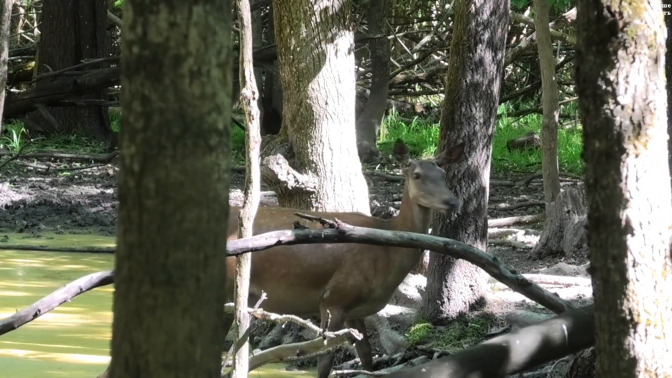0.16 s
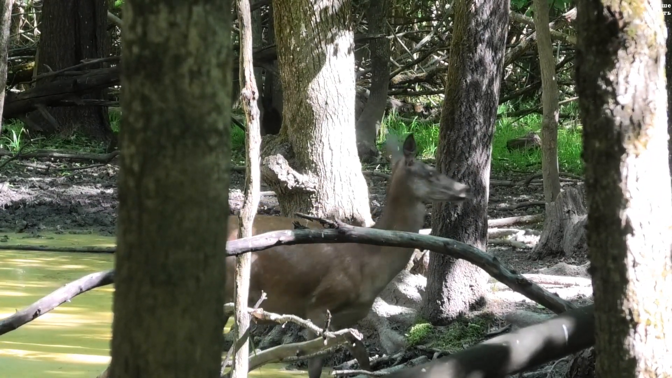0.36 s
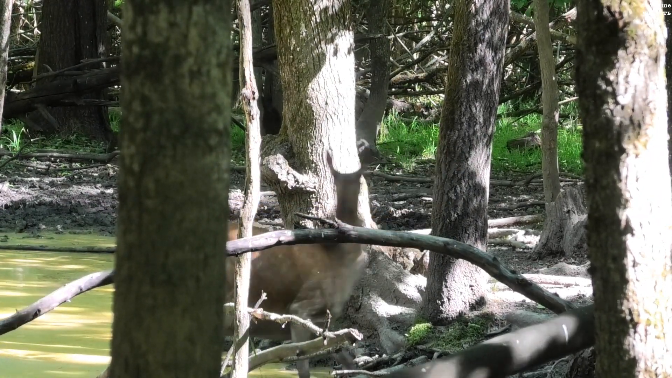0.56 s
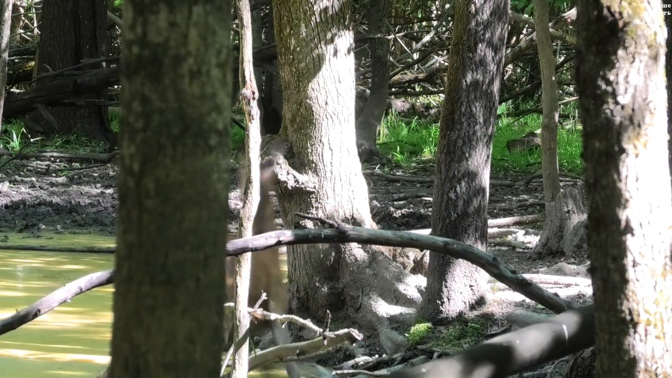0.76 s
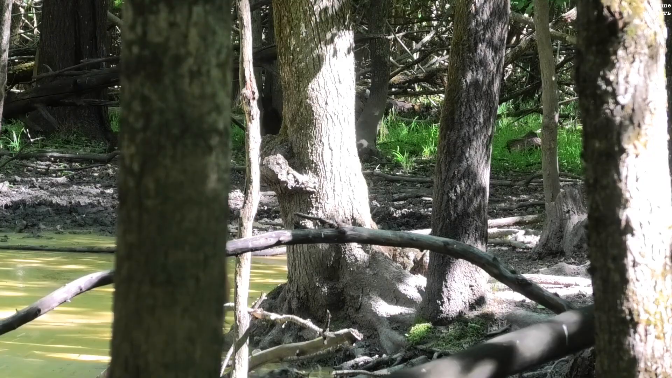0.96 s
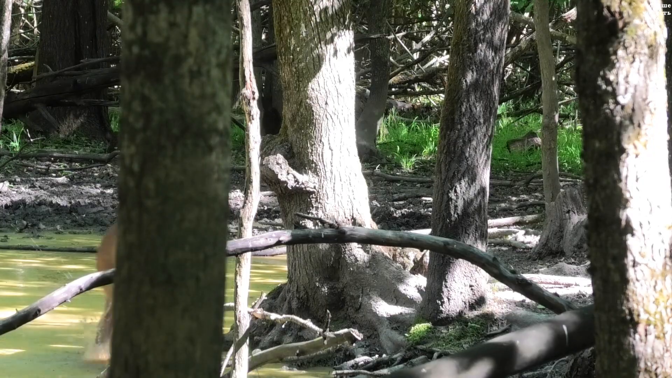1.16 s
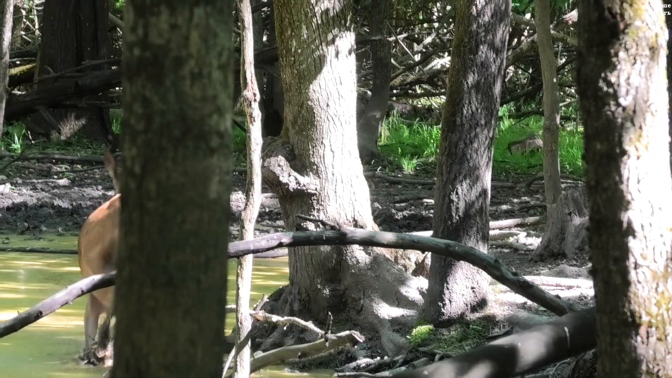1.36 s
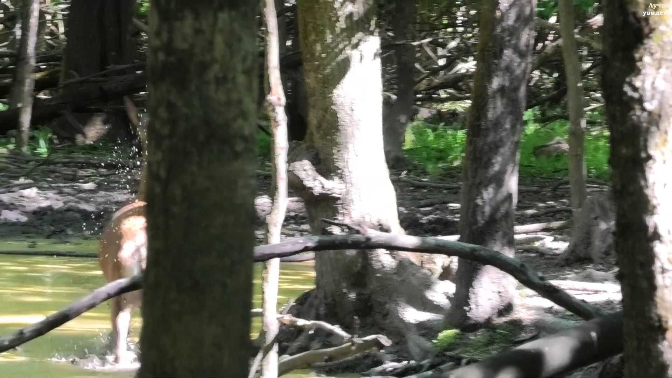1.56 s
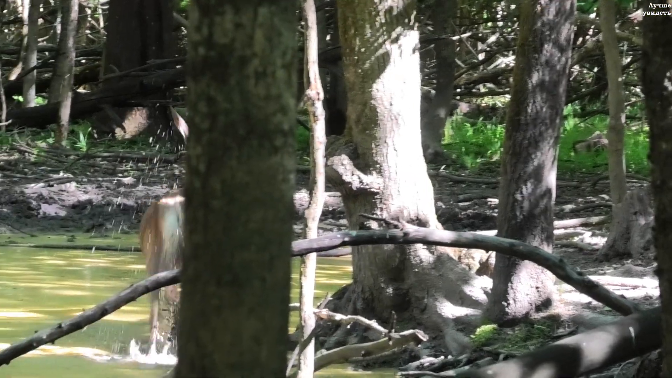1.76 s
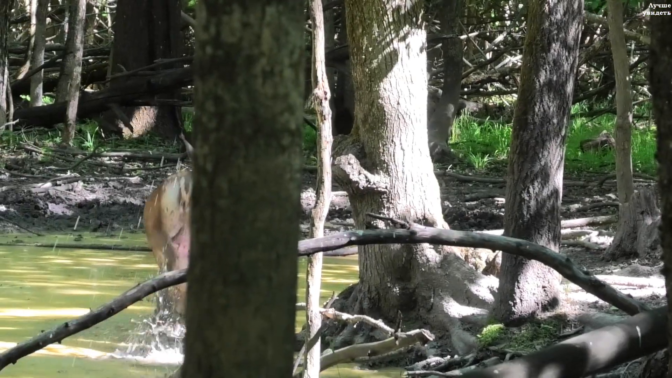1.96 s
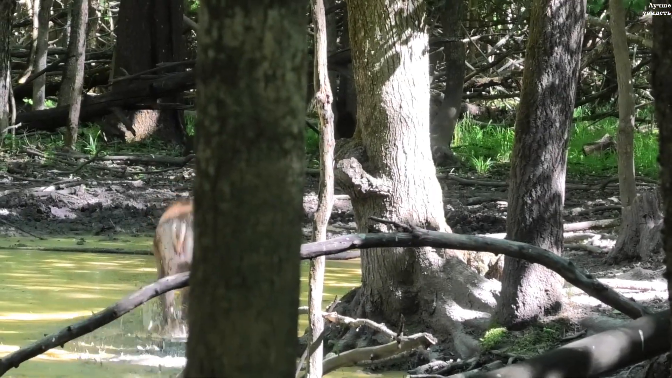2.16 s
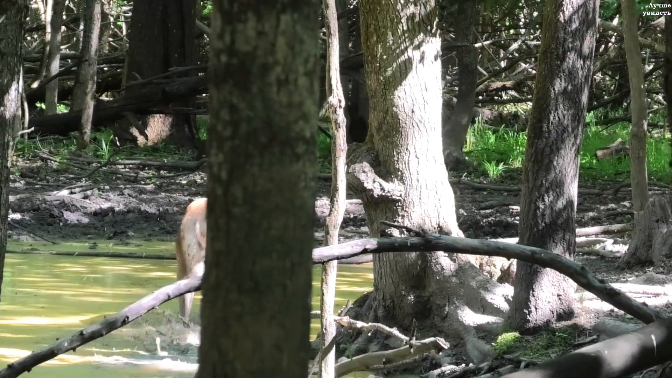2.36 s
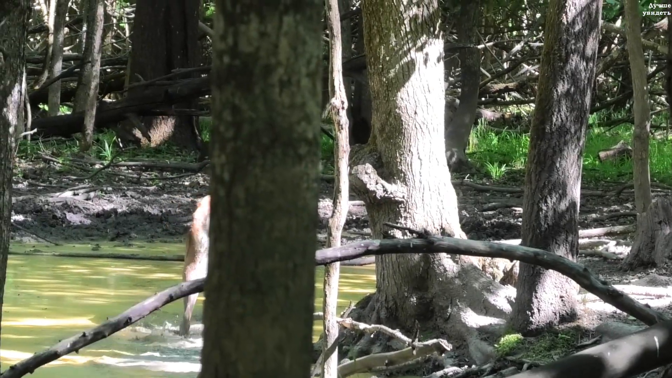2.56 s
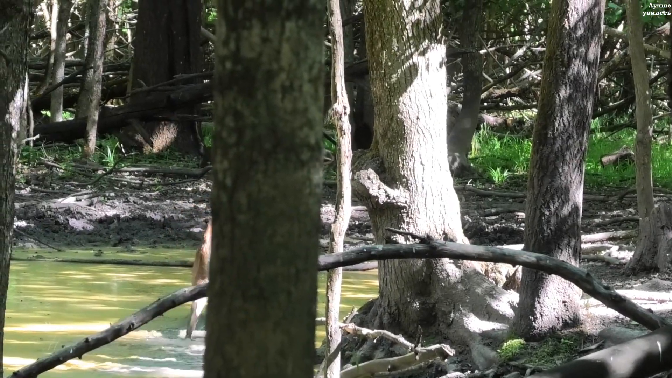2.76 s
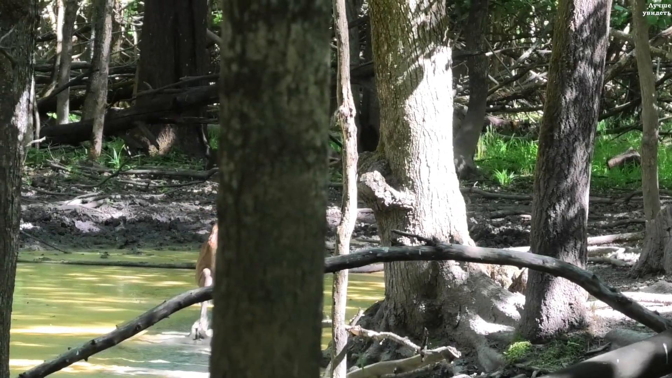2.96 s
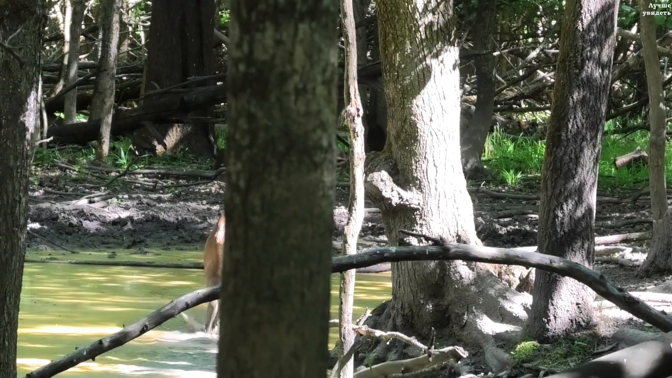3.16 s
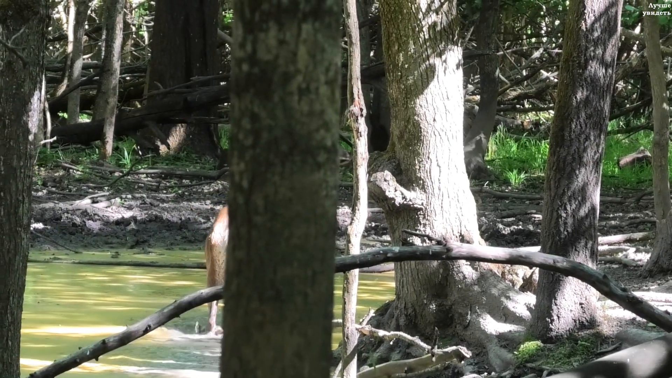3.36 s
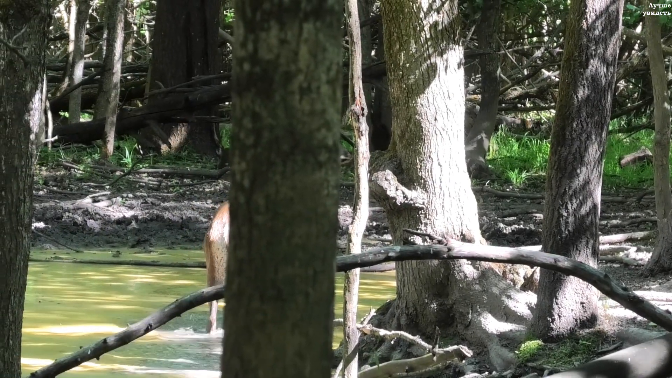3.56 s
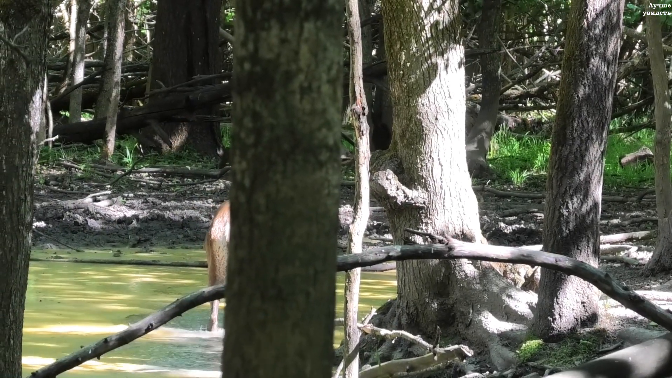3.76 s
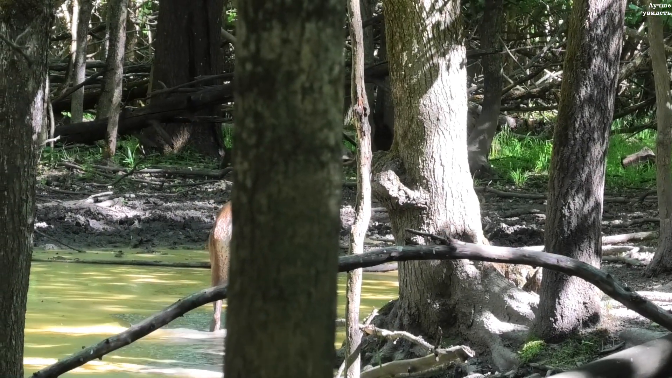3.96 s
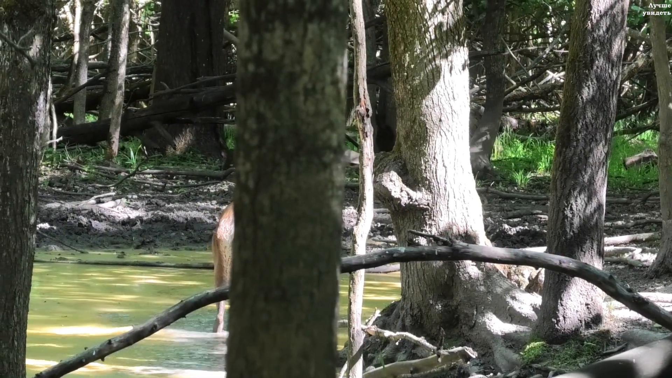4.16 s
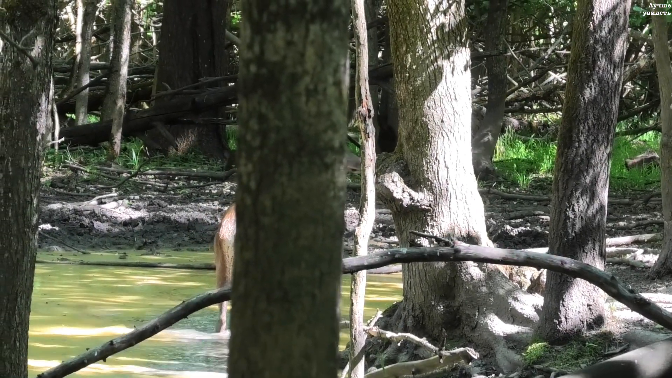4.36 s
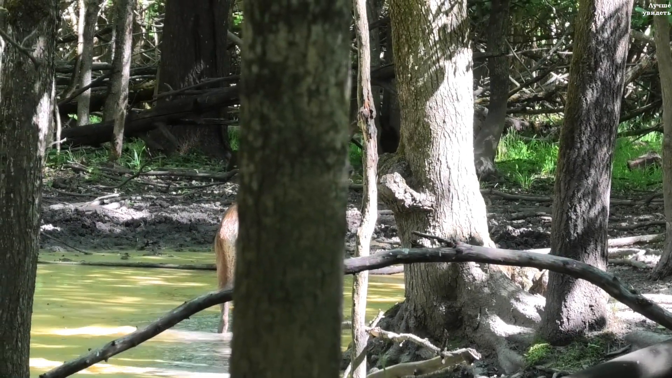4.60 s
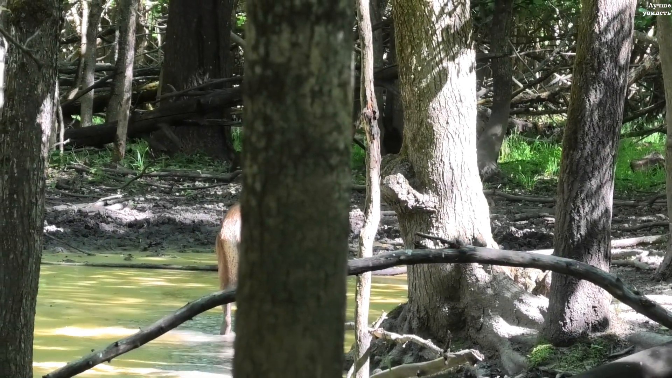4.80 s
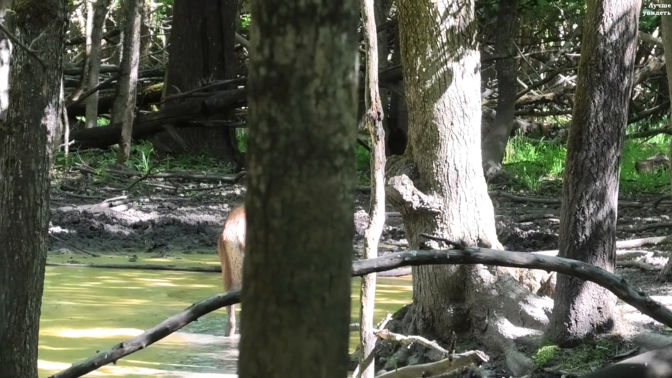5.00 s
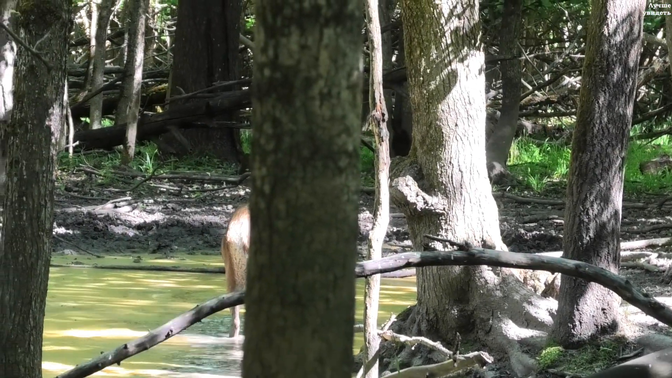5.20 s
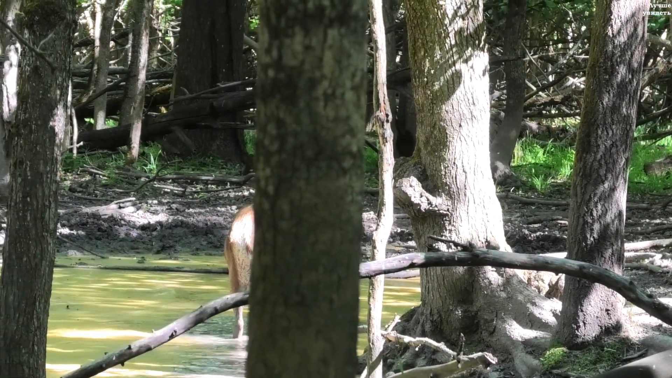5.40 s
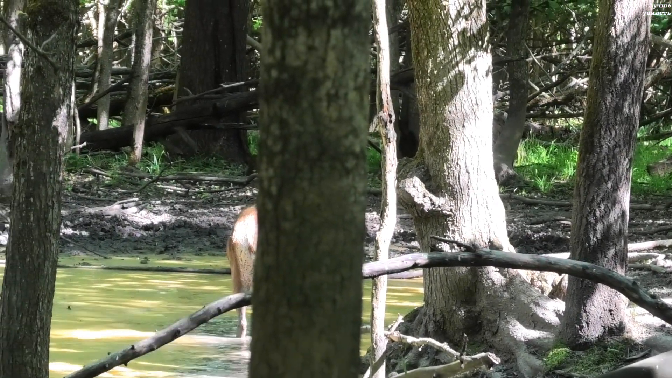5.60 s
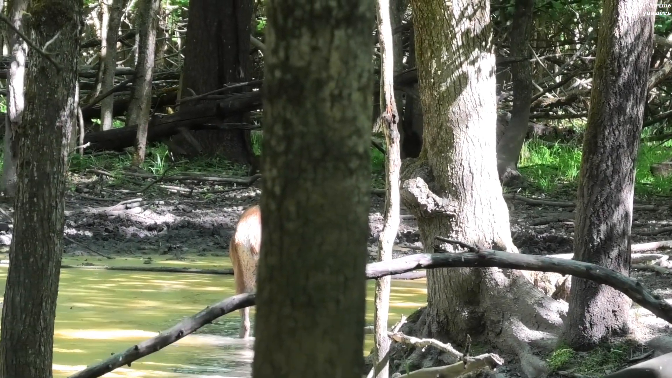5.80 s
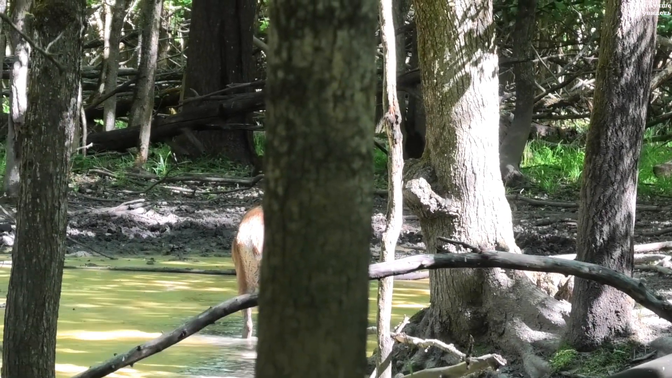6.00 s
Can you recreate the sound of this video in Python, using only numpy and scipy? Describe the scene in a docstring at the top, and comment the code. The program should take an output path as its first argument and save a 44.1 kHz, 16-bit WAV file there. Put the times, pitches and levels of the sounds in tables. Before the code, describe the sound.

A deer bounds into a shallow muddy pool in a quiet forest. Its hooves slap up a quick run of splashes with sharp little pops, and water patters back with plinking bubbles. It then slows to a wade, with softer splashes, one small click on the right and gentle sloshing. The water is heard in wide stereo, with a short echo off the trees and a faint steady hiss behind it.

```python
"""A shallow muddy pool among trees: a deer bounds in, slows to a wade and stands.
Each hoof slaps up a splash, most with the pop of an air pocket; one small click sounds on the right.
Water patters back and surges round the legs, leaving ringing bubbles.
The trunks scatter the water sounds back over the faint steady hiss of the forest."""
import sys
import numpy as np
from scipy import signal
from scipy.fft import rfft, irfft
from scipy.io import wavfile
from scipy.ndimage import uniform_filter1d

SR = 44100
rng = np.random.default_rng(int(sys.argv[2]) if len(sys.argv) > 2 else 0)


def materialize(psi):
    """Save the field psi as 16-bit PCM at rate SR to the path in sys.argv[1].

    A 1-D psi becomes a single channel; in a 2-D psi each row is a channel.
    """
    bounded = np.clip(np.atleast_2d(psi).T, -1, 1)
    quanta = np.round(bounded * 32767).astype(np.int16)
    wavfile.write(sys.argv[1], SR, quanta)


N = 266364
TIME, HZ = np.arange(N) / SR, np.fft.rfftfreq(N, 1 / SR)


def amp(db):
    """Decibels to gain."""
    return 10 ** (np.asarray(db) / 20)


def unit(x):
    """Scales to rms 1."""
    return x / np.sqrt(np.mean(x ** 2) + 1e-20)


def curve(points, hz=HZ):
    """Interpolates over log frequency."""
    knots_hz, values = np.transpose(points)
    return np.interp(np.log(hz + 1), np.log(knots_hz + 1), values)


def colour(x, db):
    """Filters by a dB gain per FFT bin."""
    return irfft(rfft(x) * amp(db), N)


def highpass(x, hz, order):
    """Butterworth high-pass."""
    return signal.sosfilt(signal.butter(order, hz, "high", fs=SR, output="sos"), x)


def resonance(hz, width_hz):
    """Spectral peak of height 1."""
    return 1 / (1 + (2 * (HZ - hz) / width_hz) ** 2)


def sides(db):
    """Splits left minus right into a dB offset per channel."""
    return np.array([[.5], [-.5]]) * db


def add(mix, at_s, sound):
    """Mixes a sound in at at_s."""
    part = mix[:, round(at_s * SR):][:, :sound.shape[-1]]
    part += sound[..., :part.shape[-1]]


# Hiss spectrum (frequency [Hz], relative density [dB])
HISS_SPECTRUM_DB = [(30, -54), (85, -45), (255, -21), (540, -9.5), (850, -6), (1050, -2), (1580, 2.5),
                    (2800, -0.5), (3600, 1), (4400, -3), (9800, -8.5), (15800, -15)]
# Hiss left-right likeness (frequency [Hz], correlation [0..1])
HISS_CORRELATION = [(200, 0.68), (640, 0.69), (3000, 0.61), (7000, 0.76), (15000, 0.36)]
# Rightward lean of the pool, doubled for the hiss (frequency [Hz], left minus right [dB])
LEAN_DB = [(300, 0), (1300, -1.1), (3500, -1.06), (8000, 0)]
def forest_hiss(level_db=-37.5):
    """Smooth, wide hiss: noise partly shared by both channels."""
    common, apart = rfft(rng.standard_normal((2, N)))
    correlation = curve(HISS_CORRELATION)
    mid, side = common * np.sqrt(1 + correlation), apart * np.sqrt(1 - correlation)
    pair = irfft([mid + side, mid - side], N)
    return amp(level_db) * unit(colour(pair, curve(HISS_SPECTRUM_DB) + sides(2 * curve(LEAN_DB))))


def faint_ring(crest_s=4.81, sigma_s=.088, hz=3530, width_hz=300, level_db=-45.5):
    """A narrow, fuzzy high tone swells and fades."""
    tone = irfft(rfft(rng.standard_normal(N)) * resonance(hz, width_hz), N)
    return amp(level_db) * unit(tone) * np.exp(-((TIME - crest_s) / sigma_s) ** 2 / 2)


# Echo off the trunks (frequency [Hz], gain [dB])
ECHO_GAIN_DB = [(250, -29), (700, -4.5), (2500, -7.5), (7000, -5), (15000, -8)]
# Echo decay (frequency [Hz], T60 [s])
ECHO_T60_S = [(300, 0.46), (2000, 0.4), (6000, 0.12), (15000, 0.47)]
def tree_echoes(source, first_s=.004, taps_per_s=2500, drift_rad_per_s=1.737 * np.pi, count=4):
    """Trunks scatter sparse echoes, different at each ear; the tails crossfade as the deer moves."""
    source, out = colour(source, curve(ECHO_GAIN_DB)), np.zeros((2, N))
    for k in range(count):
        taps = rng.standard_normal((2, SR)) * (rng.random((2, SR)) < taps_per_s / SR)
        hz, t, spectra = signal.stft(taps * (TIME[:SR] > first_s), SR, nperseg=256)
        t60_s = curve(ECHO_T60_S, hz)[:, None]
        tail = signal.istft(spectra * amp(-60 * t / t60_s) / np.sqrt(t60_s), SR, nperseg=256)[1]
        tail /= np.linalg.norm(tail, axis=1, keepdims=True)
        share = np.cos(drift_rad_per_s * TIME + np.pi * k / count) ** 3
        out += signal.fftconvolve(source * unit(share), tail, axes=1)[:, :N]
    return out / np.sqrt(count)


# Very faint low thumps (time [s], level [dB])
LOW_THUMPS = [(1.078, -72), (1.608, -73), (4.122, -70)]
def low_thumps(hz=52, decay_s=.008):
    """Very faint thumps under three splashes, each one heavily damped low swing."""
    out, t = np.zeros((2, N)), TIME[:SR // 5]
    swing = np.sin(2 * np.pi * hz * t) * t / decay_s * np.exp(1 - t / decay_s)
    for at_s, db in LOW_THUMPS:
        add(out, at_s, amp(db) * swing)
    return out


def bubble(hz, decay_cycles=8.8, glide=.019):
    """An air pocket rings and dies, its pitch rising as it nears the surface."""
    age = np.linspace(0, 2 * np.pi, int(2 * np.pi * decay_cycles / hz * SR) + 2)  # in decay times
    cycles = decay_cycles * (age + glide * age ** 2 / 2)
    onset = 1 - np.exp(-2 * np.pi * cycles)
    return np.sin(2 * np.pi * cycles) * np.exp(-age) * onset


def impacts(per_s, spread_db):
    """Random drop impacts: many small, a few large."""
    size = amp(spread_db * np.minimum(rng.exponential(1, N), 4))
    return size * rng.choice([-1, 1], N) * (rng.random(N) < per_s / SR)


# Splashing water spectrum (frequency [Hz], relative density [dB])
WATER_SPECTRUM_DB = [(40, -45), (100, -44.5), (220, -28), (380, -21), (560, -14.5), (900, -10),
                     (1170, -2.5), (1450, -5), (2400, 1), (3600, -2.5), (5100, -8), (7000, -9.5),
                     (11600, -15), (15800, -23)]
# Narrow peaks and dips in the pool's colour (frequency [Hz], width [Hz], gain [dB])
POOL_BANDS = [(1650, 230, 3), (2030, 210, -1), (2480, 250, -1), (2824, 85, -5.5), (3640, 210, -0.5)]
def droplets(per_s, spread_db, bubbles_db, bubble_density, decay_cycles, pitches=64):
    """Drops tick on the surface; some trap a bubble that rings for a few cycles."""
    ringing = np.zeros(N)
    for hz in np.geomspace(450, 11000, pitches) * rng.uniform(.97, 1.03, pitches):
        ring = bubble(hz, decay_cycles * rng.uniform(.22, 1.95), glide=.017)
        train = unit(impacts(bubble_density / pitches * np.sqrt(hz / 2000), spread_db))
        ringing += signal.oaconvolve(train, ring / np.linalg.norm(ring))[:N] * np.sqrt(hz)
    drops = unit(impacts(per_s, spread_db)) + amp(bubbles_db) * unit(ringing)
    bands_db = sum(db * resonance(hz, width_hz) for hz, width_hz, db in POOL_BANDS)
    return unit(colour(drops, curve(WATER_SPECTRUM_DB) + bands_db))


def split_water(water, slosh_hz=800, spray_hz=5200):
    """Splits water sound into low slosh, mid patter and fine spray."""
    slosh = irfft(rfft(water) / (1 + (HZ / slosh_hz) ** 4), N)
    spray = water - irfft(rfft(water) / (1 + (HZ / spray_hz) ** 4), N)
    return slosh, water - slosh - spray, spray


# Pool churn, rising with the bounds and settling in the wade (time [s], level [dB])
CHURN_DB = [(0, -34), (.68, -33), (1.04, -29), (1.2, -25), (1.4, -26), (1.6, -28.5), (2.0, -26),
            (2.63, -28.5), (2.79, -35), (3.35, -35.5), (3.62, -41), (4.3, -45), (6.04, -51.5)]
# Water pushed by a leg or falling back (crest [s], level [dB], length [s], relative slosh [dB])
WATER_SURGES = [(0.753, -30, 0.096, -2), (0.89, -29.5, 0.11, -10), (1.273, -26, 0.12, 3),
                (1.676, -24.5, 0.24, -0.5), (1.974, -22.5, 0.051, 5), (2.125, -34.5, 0.022, 17.5),
                (2.213, -29, 0.027, -6), (2.504, -35.5, .11, -10), (2.885, -32.5, .04, -7),
                (3.13, -36, 0.15, -6), (3.244, -34, .06, 6), (4, -37.5, 0.11, -1), (4.12, -32, 0.037, 8),
                (4.43, -40, 0.083, -1), (4.823, -38.5, 0.12, 3), (5.094, -38.5, 0.13, 9.5),
                (5.294, -40, 0.092, 9), (5.394, -38, 0.046, 6), (5.72, -38.5, 0.077, 11),
                (5.914, -36.5, .08, 7)]
def stirred_water(clump_db=1, clump_s=.026, spray_db=-1):
    """Water falls back in clumps and sloshes round the legs, in surges over a continuous churn."""
    drops = droplets(per_s=9000, spread_db=2, bubbles_db=-9, bubble_density=900, decay_cycles=9.5)
    slosh, patter, spray = split_water(drops)
    churn_db = np.interp(TIME, *np.transpose(CHURN_DB))
    effort_db = churn_db + 30  # harder churn: less slosh, more spray
    power = amp(churn_db) ** 2
    slosh_power = power * amp(2.5 - .14 * effort_db) ** 2
    spray_power = power * amp(1.97 + .1 * effort_db) ** 2
    for crest_s, db, length_s, slosh_db in WATER_SURGES:
        surge = amp(db) ** 2 * np.exp(-(2 * (TIME - crest_s) / length_s) ** 2)
        power += surge
        slosh_power += surge * amp(slosh_db) ** 2
        spray_power += surge * amp(spray_db) ** 2
    clumps = unit(uniform_filter1d(rng.standard_normal(N), int(clump_s * SR)))
    water = np.sqrt(slosh_power) * slosh + np.sqrt(power) * patter + np.sqrt(spray_power) * spray
    return amp(-clump_db * clumps) * water


def stray_drops(per_s=12, over_churn_db=3, scatter_db=5.5, centre_hz=3590, scatter_octaves=1.107):
    """Single drops plink at random; their level follows the churn that throws them."""
    out = np.zeros((2, N))
    for when, size, pitch in rng.random((int(per_s * N / SR), 3)):
        at_s = when * N / SR
        db = np.interp(at_s, *np.transpose(CHURN_DB)) + over_churn_db + scatter_db * (2 * size - 1)
        hz = centre_hz * 2 ** (scatter_octaves * (2 * pitch - 1))
        add(out, at_s, amp(db) * bubble(hz, glide=.011))
    return highpass(out, hz=600, order=3)


# Large bubbles and drops (time [s], level [dB], pitch [Hz])
LARGE_BUBBLES = [(.738, -18, 2100), (1.285, -14.5, 3200), (1.321, -16, 3530), (1.387, -13.5, 11400),
                 (1.4735, -5.5, 2370), (1.622, -11, 1203), (1.6298, -5, 4180), (1.762, -12, 6840),
                 (2.03, -20, 2500), (2.122, -26, 554), (2.138, -17, 1212), (2.198, -22, 1710),
                 (2.328, -17, 2260), (2.415, -18, 2330), (2.461, -17, 1790), (2.508, -19, 2350),
                 (2.585, -19, 2440), (2.653, -21, 1740), (4.002, -32, 1440), (4.053, -29, 1430)]
def large_bubbles(pan_db=.5):
    """Single bubbles ring out, the low ones longer; too small to radiate bass."""
    out = np.zeros((2, N))
    for at_s, db, hz in LARGE_BUBBLES:
        add(out, at_s, amp(db + sides(pan_db)) * bubble(hz))
    return highpass(out, hz=400, order=3)


def crest(at_s, rise_s, decay_s):
    """Envelope: swells to 1 at at_s, then decays."""
    swell = np.clip(1 + (TIME - at_s) / rise_s, 0, 1) ** .6
    return swell * np.exp(-np.clip((TIME - at_s) / decay_s, 0, 20))


# Hoof splashes and pops (time [s], splash level [dB], entry [s], relative spray [dB],
# relative slap [dB], pop level [dB], pop pitch [Hz], pop left minus right [dB])
# The last row's pop is a small sharp click close by on the right.
SPLASHES_AND_POPS = [(.902, -30, 0.026, 6.5, -12, -19, 2630, -1),
                     (1.095, -24, .014, 7.5, 4.5, -8.5, 2680, 4),
                     (1.4723, -20, .05, 4, 6.5, -4.5, 2400, -2.5),
                     (1.6278, -18.5, 0.038, -2, 0, -2, 2850, -1),
                     (1.888, -19.5, 0.036, 0, -12, -13, 1770, -6),
                     (1.918, -28, 0.0055, 12, 6.5, -3, 2530, -1), (2.078, -27, 0.017, 9, 6, -19, 8000, 0),
                     (2.089, -22.5, 0.043, 0.5, -8, -7, 2280, 1),
                     (2.460, -28, 0.059, 5, -8, -9.5, 2590, -2),
                     (3.098, -34, .035, -4, -10, -14.5, 3200, -3),
                     (3.32, -34.5, 0.05, 4, -10, -19.5, 1620, 1),
                     (4.1415, -27, .065, 3, -14, -15.5, 1830, -17)]
def hoof_splashes(heave_s=.023, slap_spray_db=-.5):
    """The flat of a hoof slaps; the entering leg tears up a sheet of water that collapses into drops."""
    drops = droplets(per_s=13000, spread_db=3, bubbles_db=-18, bubble_density=2400, decay_cycles=2.3)
    slosh, patter, spray = split_water(drops)
    power, spray_power = np.zeros(N), np.zeros(N)
    for at_s, db, entry_s, spray_db, slap_db, *_ in SPLASHES_AND_POPS:
        sheet = amp(db) * crest(at_s, rise_s=entry_s, decay_s=.055)
        slap = amp(db + slap_db) * crest(at_s, rise_s=.00096, decay_s=.006)
        power += sheet ** 2 + slap ** 2
        spray_power += (sheet ** 2 + (slap * amp(slap_spray_db)) ** 2) * amp(spray_db) ** 2
    slosh_power = np.maximum(uniform_filter1d(power, int(heave_s * SR)), 0)  # bulk water is slower
    return np.sqrt(slosh_power) * slosh + np.sqrt(power) * patter + np.sqrt(spray_power) * spray


def pops_and_click(decay_cycles=3.64, second_delay_s=.00257, second_ratio=1.2, second_db=-5.5):
    """Pairs of brief rings: air pockets slapped shut by hooves, and lastly a sharp click on the right."""
    out = np.zeros((2, N))
    for at_s, *_, db, hz, pan_db in SPLASHES_AND_POPS:
        gain = amp(db + sides(pan_db))
        add(out, at_s, gain * bubble(hz, decay_cycles))
        add(out, at_s + second_delay_s, gain * amp(second_db) * bubble(hz * second_ratio, decay_cycles))
    return highpass(out, hz=400, order=3)


def scene():
    """The deer in the pool, its echo among the trees, and the forest behind."""
    water = amp(-1) * stirred_water() + amp(-.5) * hoof_splashes()
    water = highpass(water, hz=190, order=2)  # shallow water radiates little bass
    water = colour(water, sides(curve(LEAN_DB)))
    pops = pops_and_click() + large_bubbles() + stray_drops()
    echoes = tree_echoes(water + amp(-2) * pops)
    return water + pops + echoes + low_thumps() + faint_ring() + forest_hiss()


# Stereo width by frequency, narrowing to mono near 7 kHz (frequency [Hz], side gain [dB])
SIDE_GAIN_DB = [(60, 3), (180, 1), (290, -10), (420, 0), (1000, 1.5), (3000, 2), (4800, 2.5), (5800, -1.5),
                (6600, -41), (8000, -44), (9200, -2.5), (15000, 5)]
def record(dry, ceiling=.95, cutoff_hz=15930):
    """Stereo width, soft ceiling on the loudest pops, band limit."""
    mid, side = dry.mean(0), colour((dry[0] - dry[1]) / 2, curve(SIDE_GAIN_DB))
    pair = np.array([mid + side, mid - side])
    pair /= (1 + (pair / ceiling) ** 16) ** (1 / 16)
    lowpass = signal.firwin(611, cutoff_hz, window=("kaiser", 9), fs=SR)
    return signal.oaconvolve(pair, lowpass[None], "same", axes=1)


dry = scene()
out = record(dry)
materialize(out)
```